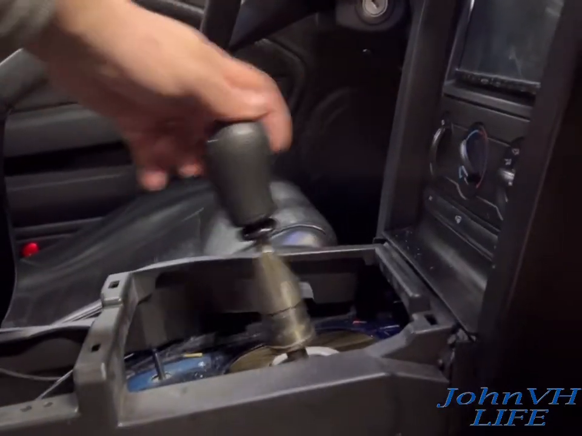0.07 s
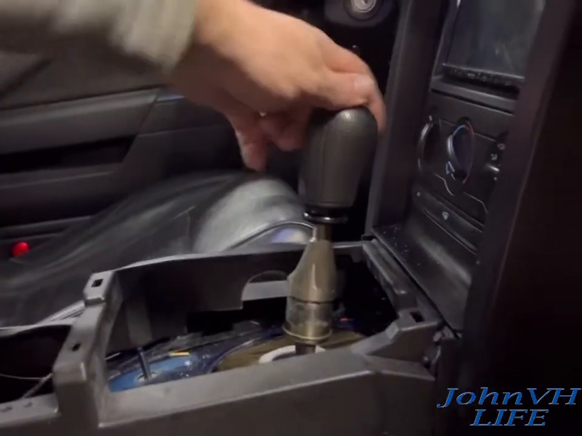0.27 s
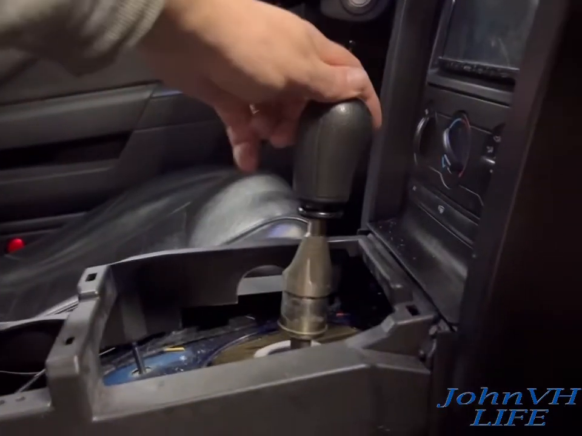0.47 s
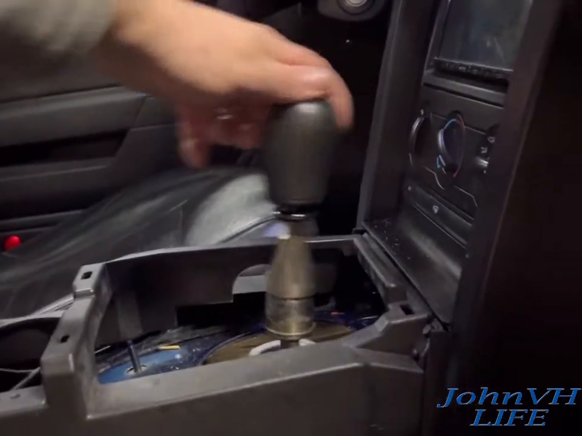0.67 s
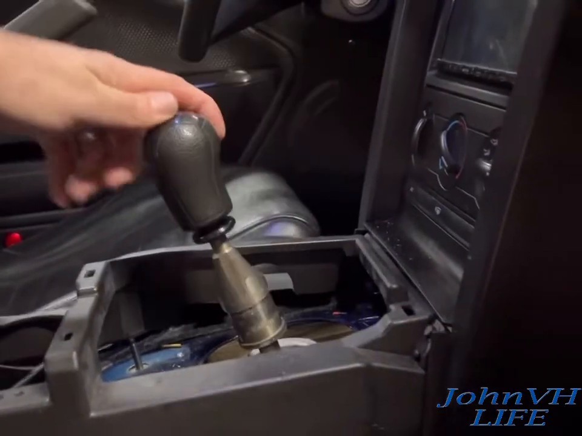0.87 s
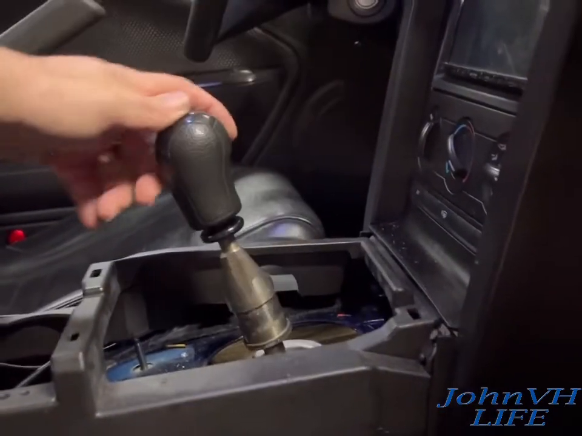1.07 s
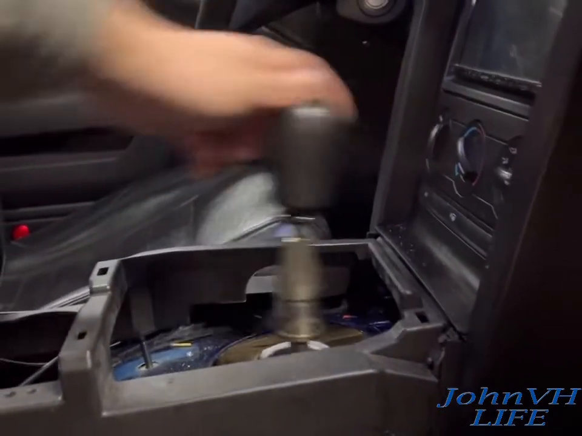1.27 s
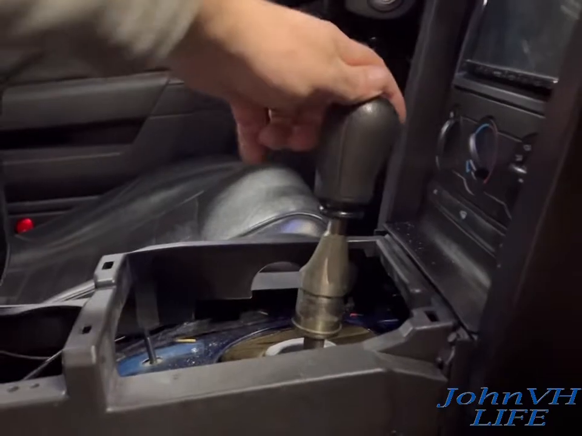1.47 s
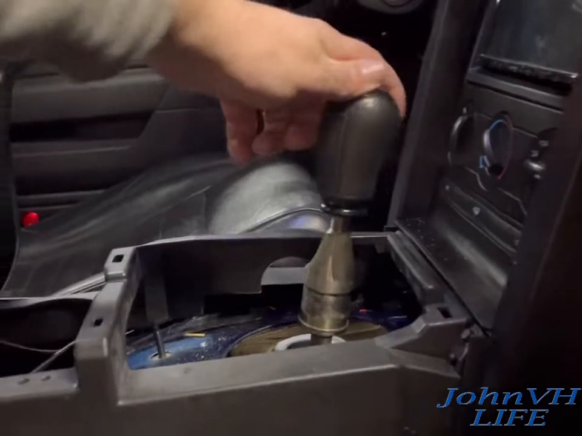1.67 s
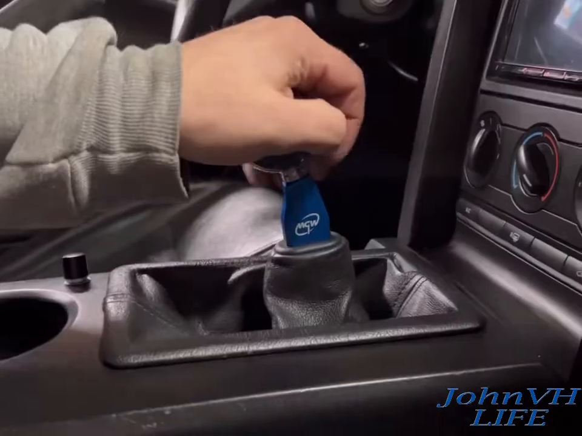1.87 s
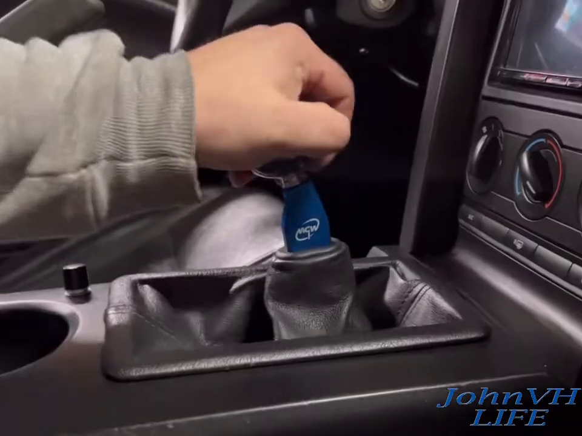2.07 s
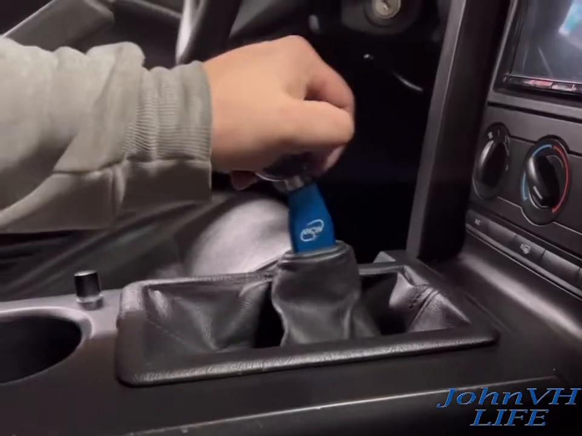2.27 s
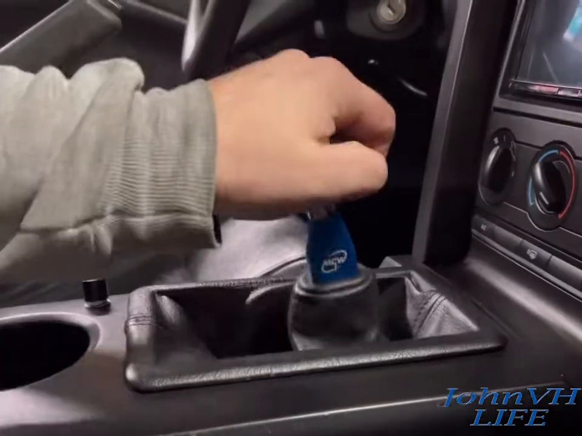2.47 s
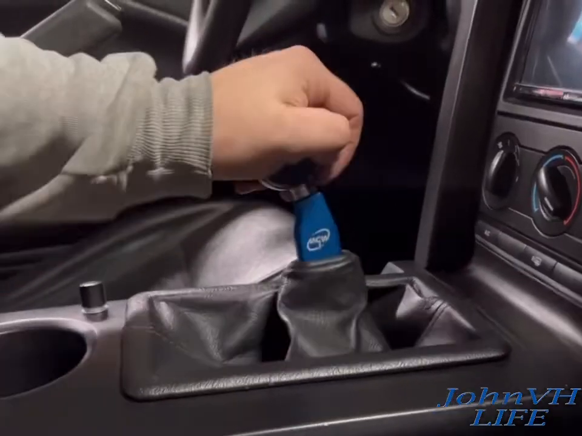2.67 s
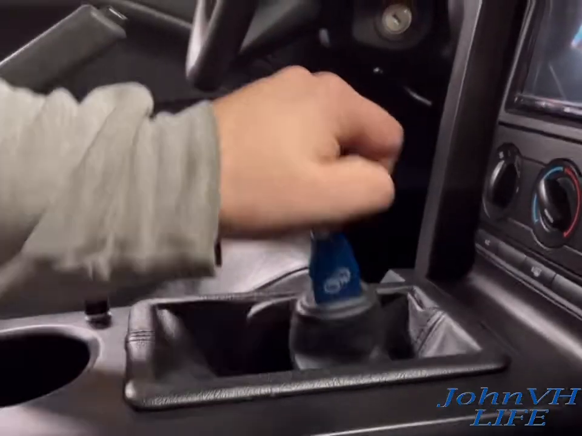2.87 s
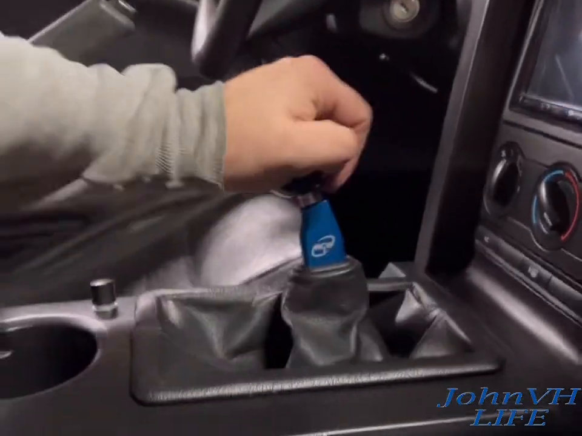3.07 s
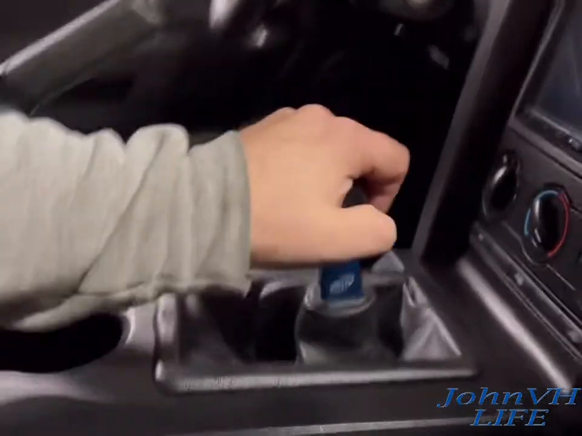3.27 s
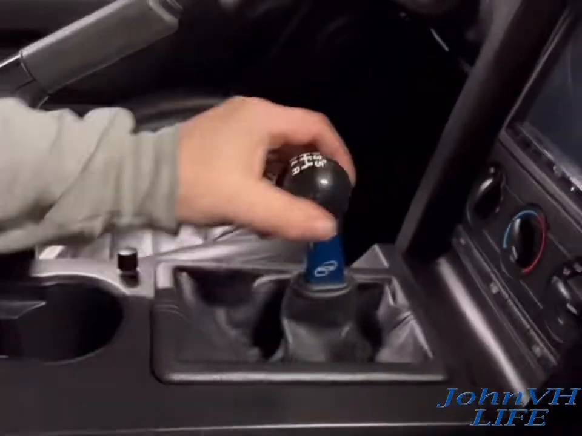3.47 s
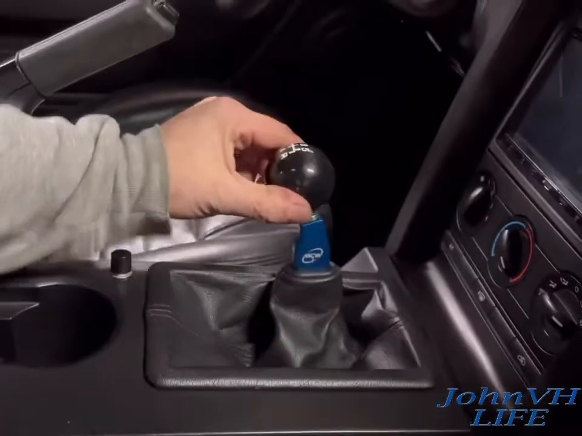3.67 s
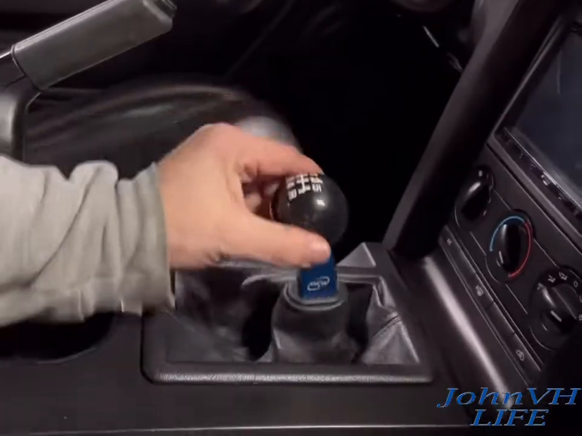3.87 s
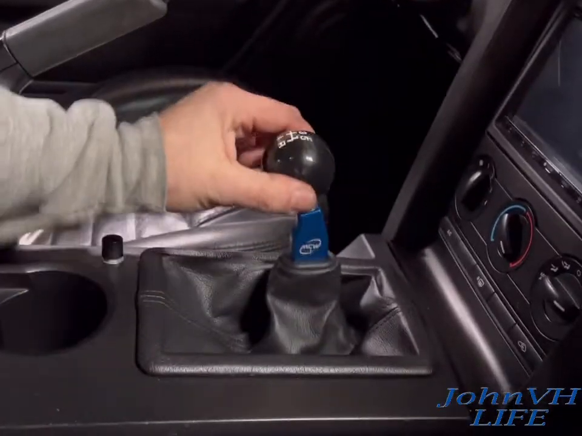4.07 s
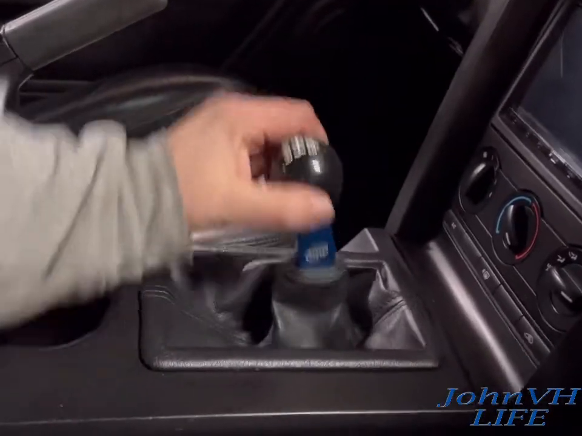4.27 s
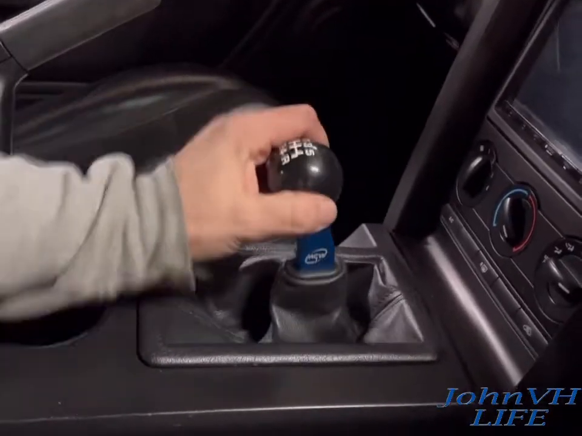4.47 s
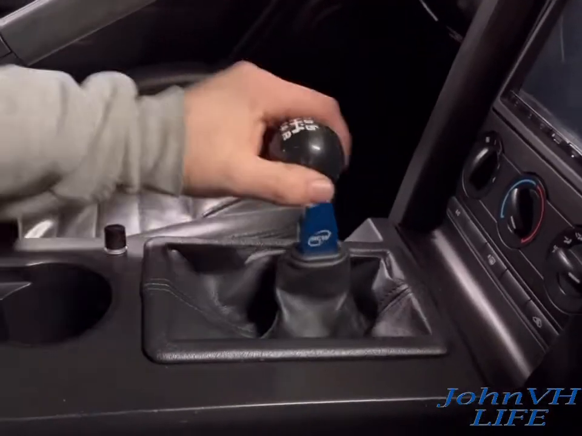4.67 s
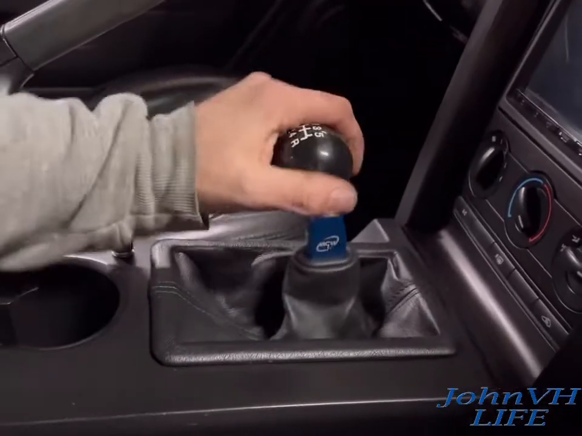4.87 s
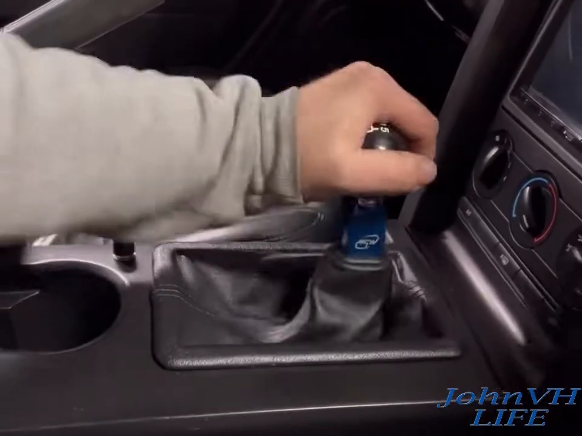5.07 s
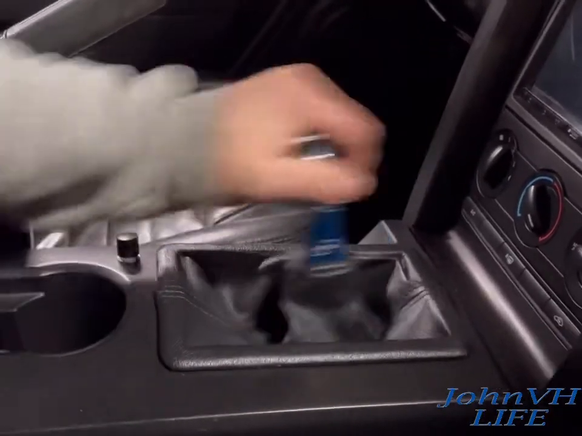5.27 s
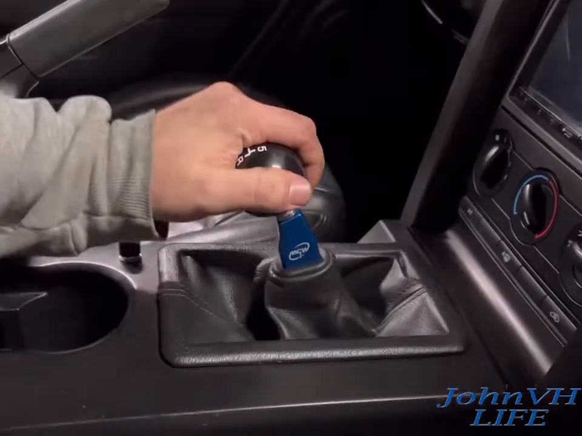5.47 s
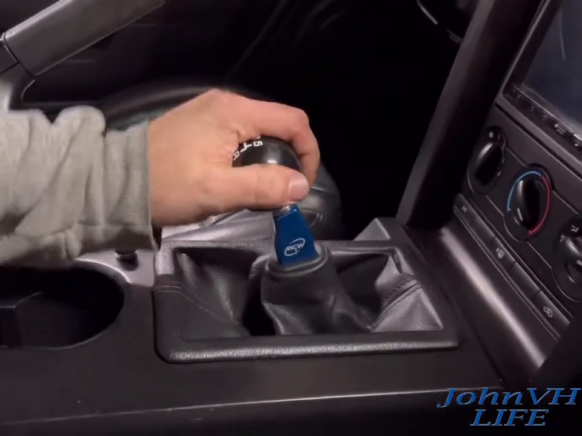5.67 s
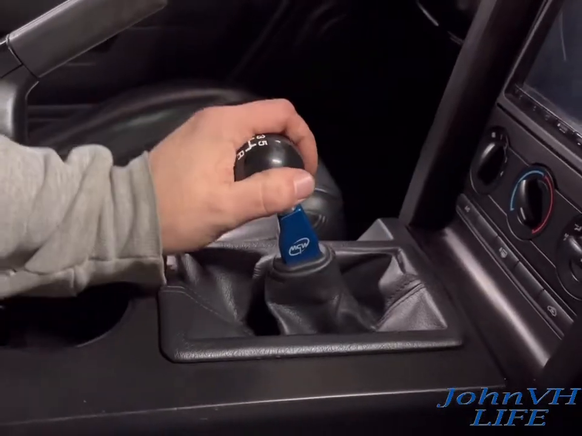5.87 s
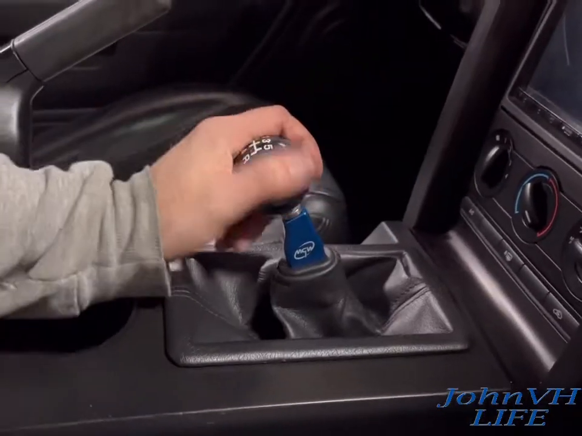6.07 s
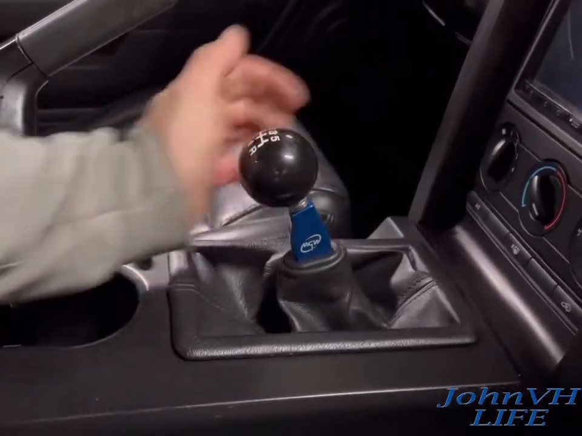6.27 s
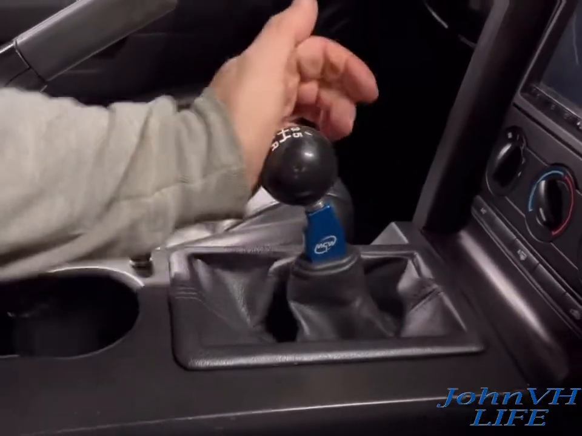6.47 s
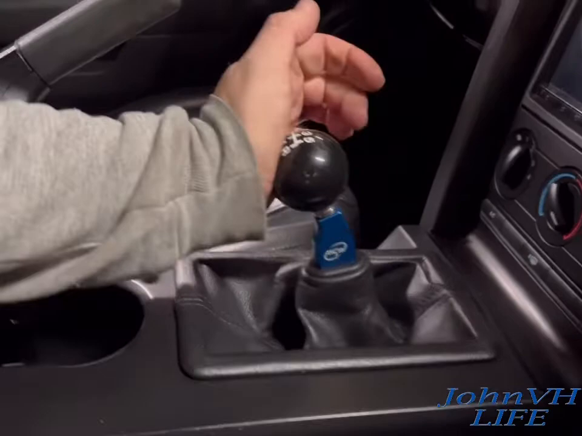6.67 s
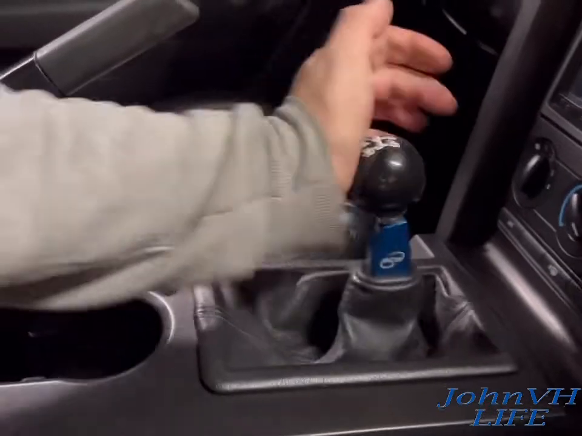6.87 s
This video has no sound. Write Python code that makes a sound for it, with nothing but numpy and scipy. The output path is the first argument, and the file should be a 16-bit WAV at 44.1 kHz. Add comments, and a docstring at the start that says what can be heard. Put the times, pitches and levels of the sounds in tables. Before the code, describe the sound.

Close stereo in a parked car with steady soft air hiss. A bare gear lever slides with short metal scrapes into hard, bright clacks at about 0.16, 0.77, 1.29 and 1.83 s, each with a brief metallic ring, low floor thump and short hard-walled reflection; light rubbing fills the start. At 1.84 s a hard cut brings a duller, quieter hiss and faint low hum. From 2.1 to 4.7 s a booted lever is wiggled: irregular muffled thumps, strongest near 2.84, 3.03 and 3.23, small ticks, leather and trim creaks, sleeve rustle, and tiny thin squeaks around 4.5. Two forceful shifts scrape and clunk at 5.03 and 5.32 to 5.36 s, deep and booming, the second heaviest. Near-quiet follows, then faint hand taps from 6.14, a soft thump at 6.36, and light knocks with a creak and scrape near 6.8.

```python
"""Inside a parked car, a hand throws a bare gear lever between its stops over the hiss of still air.
After a hard cut, a lever in a leather boot wiggles, then shifts harder, over a faint hum and a duller hiss.
Swelling low tones make the thumps and coloured noise the shaking pan; bursts of force ring the linkage.
Uneven noise rustles, scrapes and creaks, gliding tones squeak, and a noise tail is the garage's answer."""
import sys
import numpy as np
from scipy import signal
from scipy.fft import rfft, irfft, next_fast_len
from scipy.io import wavfile
from scipy.ndimage import uniform_filter1d

SR = 44100
rng = np.random.default_rng(int(sys.argv[2]) if len(sys.argv) > 2 else 0)


def digitize_waveform(pressure):
    """Quantize a signal to 16-bit integers and store it at the path in sys.argv[1].

    Rows of a 2-D input are taken as channels; values are limited to [-1, 1].
    """
    field = np.atleast_2d(pressure).T
    bounded = np.clip(field, -1, 1)
    quanta = np.round(bounded * 32767).astype(np.int16)
    wavfile.write(sys.argv[1], SR, quanta)


def magnitude_from_level(level_db):
    """Linear magnitude for a level in decibels (20 dB per decade)."""
    exponent = np.asarray(level_db, float) / 20
    return 10 ** exponent


N = 304731
CUT_S = 1.8395  # the bare lever gives way to the booted one

# Colours of noise are relative, since the noise is then set to rms 1.
# still air around each lever: pitch_hz [Hz], relative_db [dB]
AIR_BARE = [(76, -17.5), (130, 4), (247, 15), (308, 3.5), (400, 9), (552, 4), (1230, 5), (1900, -3),
            (6530, -18), (9950, -37.5), (15800, -36.5)]
AIR_BOOTED = [(90, -20), (140, 0), (300, -9), (900, -25.5), (1980, -30.5), (2130, -22.5), (2300, -34),
              (6800, -43.5), (7600, -49.5), (15800, -51)]
# low rumble under the hum: pitch_hz [Hz], relative_db [dB]
RUMBLE_COLOUR = [(30, -30), (47.6, 0), (70, -16), (300, -90)]

# thin high swishes: start_s [s], held_s [s], level_db [dB]
SWISHES = [(3.3, 0.069, -66.5), (3.5, 0.068, -71), (5.78, 0.24, -75)]
# their colour: pitch_hz [Hz], relative_db [dB]
SWISH_COLOUR = [(2800, -29.5), (3300, -9), (5600, -15), (6500, 0), (7100, -9), (7500, -22.5)]
# faint squeaks of boot and linkage, before waver and flicker:
# start_s [s], length_s [s], from_hz [Hz], to_hz [Hz], level_db [dB]
SQUEAKS = [(0.398, .24, 4650, 4680, -72.5), (4.466, 0.039, 3750, 4360, -69),
           (4.577, 0.037, 3680, 4370, -61), (4.583, .055, 5000, 5650, -64),
           (4.584, 0.071, 3260, 3400, -66.5), (4.67, 0.023, 3120, 3200, -64),
           (4.79, 0.092, 3880, 3960, -72), (4.915, 0.095, 3750, 3830, -72.5)]

# strokes of hand, sleeve and boot, before patchiness: start_s [s], held_s [s], dull_db [dB], bright_db [dB]
STROKES = [(0.0, 0.18, -64, -56.5), (0.401, 0.39, -87, -65.5), (2.12, 0.035, -65, -67.5),
           (2.269, 0.22, -65.5, -85), (2.57, 0.034, -62.5, -72.5), (2.64, 0.043, -61, -62),
           (2.975, 0.03, -58, -65), (3.02, 0.02, -63.5, -59.5), (3.121, 0.27, -65, -65.5),
           (3.451, 0.25, -64.5, -69.5), (3.74, 0.059, -64.5, -82.5), (3.981, 0.17, -64.5, -73.5),
           (4.281, 0.21, -66.5, -67), (4.461, 0.036, -69.5, -62), (4.579, 0.13, -66, -65),
           (6.29, 0.036, -68.5, -77.5), (6.48, 0.22, -64.5, -71), (6.811, 0.051, -63, -57.5)]
# colour of the rubbing: pitch_hz [Hz], relative_db [dB]
RUSTLE_COLOUR = [(400, -24), (750, -4), (2200, -9), (3400, -13.5), (5000, -19.5), (6900, -14),
                 (7600, -31.5), (10000, -44.5), (14000, -24.5), (15800, -56)]
STROKE_RISE_S, STROKE_FALL_DB_S = 0.043, 83

# selector sliding into gear, metal on metal: start_s [s], held_s [s], level_db [dB]
SLIDES = [(.095, 0.095, -52), (.715, 0.079, -49.5), (1.21, 0.077, -52.5), (1.755, 0.07, -69),
          (5.02, 0.079, -45.5), (5.272, 0.036, -42), (5.3, 0.028, -38), (6.82, 0.048, -52)]
# colour of the scrape: pitch_hz [Hz], relative_db [dB]
SCRAPE_COLOUR = [(410, 12), (700, -6.5), (1300, 0), (2250, -5), (2590, -5.5), (3580, -13), (4700, -14),
                 (5640, -12), (8210, -21.5), (9850, -45), (12100, -31), (15500, -38)]
# modes of the gearbox casing: pitch_hz [Hz], level_db [dB], t60_s [s]
CASING = [(883, -42.5, 0.46), (1144, -39, 0.2), (2500, -33.5, 0.033), (2920, -38.5, 0.014),
          (4430, -47, 0.066), (5200, -35.5, 0.02)]

# console trim and boot creaking under load, before patchiness: start_s [s], held_s [s], level_db [dB]
CREAKS = [(2.12, 0.022, -60), (2.285, 0.013, -69.5), (2.545, 0.043, -56.5), (2.775, 0.069, -56),
          (2.965, 0.043, -56.5), (3.06, 0.025, -66), (3.155, 0.041, -55), (3.34, 0.015, -56.5),
          (3.76, 0.018, -60.5), (3.94, 0.065, -56.5), (4.11, 0.027, -62), (4.26, 0.092, -62),
          (4.41, 0.025, -57.5), (4.56, 0.045, -61.5), (4.98, 0.094, -48.5), (5.24, 0.097, -47.5),
          (6.5, 0.04, -57), (6.81, 0.084, -46)]
# colour of the trim: pitch_hz [Hz], relative_db [dB]
TRIM_COLOUR = [(180, -32.5), (250, -1.5), (340, -2), (560, -7), (800, -16), (1400, -23), (3000, -83.5)]

# jolts that leave the floor pan shaking loosely: start_s [s], held_s [s], level_db [dB]
JOLTS = [(0.0, 0.052, -50.5), (0.101, 0.14, -36), (.48, 0.087, -52), (.72, 0.082, -29.5),
         (.87, 0.079, -43.5), (1.06, 0.031, -39), (1.221, 0.13, -31.5), (1.751, 0.033, -31),
         (2.109, 0.04, -40), (2.3, 0.15, -35.5), (2.57, 0.075, -33), (2.781, 0.092, -32),
         (2.971, 0.12, -31.5), (3.17, 0.096, -36), (3.37, 0.028, -34.5), (3.598, 0.056, -41),
         (3.77, 0.16, -37.5), (3.95, 0.041, -35), (4.132, 0.061, -35), (4.28, 0.024, -33.5),
         (4.431, 0.014, -36.5), (4.58, 0.047, -41), (4.992, 0.07, -26), (5.259, 0.16, -34.5),
         (5.55, 0.043, -55), (6.31, .07, -35), (6.49, 0.21, -50.5), (6.8, 0.064, -26)]
# colour of the shaking pan under each lever: pitch_hz [Hz], relative_db [dB]
PAN_BARE = [(15, -33), (25, -27.5), (50, 3), (86, 0.5), (102, -2), (140, -14), (220, -26.5), (290, -74.5)]
PAN_BOOTED = [(15, -57.5), (25, -30.5), (74, -3.5), (97, -1), (127, -3), (199, -23), (220, -31.5),
              (290, -78.5)]
# floor pan thumps: crest_s [s], peak_db [dB], pitch_hz [Hz], half_length_ms [ms, Gaussian]
THUMPS = [(0.1323, -30.5, 60.7, 8.5), (0.1967, -17, 70.2, 16.3), (0.746, -17, 80, 9), (0.8113, -12, 83, 10),
          (1.3254, -20.5, 84, 20.5), (1.791, -20.5, 79.6, 9.2), (2.3398, -25, 82.2, 19),
          (2.4343, -18, 104.6, 14.2), (2.5884, -23.5, 90.4, 15), (2.6054, -21.5, 126, 19),
          (2.652, -21.5, 97.3, 16), (2.694, -26, 86, 11), (2.803, -25.5, 104.6, 5.8),
          (2.8431, -14.5, 102.4, 9.8), (3.0262, -11.5, 102.4, 15), (3.2, -23.5, 85.2, 28),
          (3.2318, -12, 99, 7.5), (3.388, -28.5, 108.5, 11), (3.5444, -26, 106.5, 11),
          (3.8, -21, 96.7, 5.3), (3.971, -26.5, 124, 13), (3.993, -24.5, 84.4, 7.1),
          (4.012, -20, 113, 17.7), (4.1808, -25.5, 88, 11), (4.3119, -21.5, 106.8, 17),
          (4.4799, -24, 106, 16), (4.623, -21, 116.8, 8.6), (5.028, -18, 94, 8), (5.0499, -8, 99.4, 8.1),
          (5.061, -9, 92.5, 8.5), (5.316, -7.5, 91.7, 8), (5.335, -17, 140, 30.5),
          (5.3591, -3.5, 102.8, 7.6), (6.3559, -12.5, 112.3, 8)]
JOLT_RISE_S, JOLT_FALL_DB_S = 0.0096, 248.5
SWAY_DB, SWAY_FALL_DB_S = -13.5, 39.5  # the body sways on after each jolt

# tone of the garage's answer: pitch_hz [Hz], gain_db [dB]
GARAGE_COLOUR = [(300, -17.0), (1200, -8.0), (3000, -1.5), (9000, -10.5)]

# metal contacts in the linkage, levels as energy of the force before it rings or cracks:
# contact_s [s], knock_db [dB], tick_db [dB], chatter_ms [ms, decay of the knock]
KNOCKS = [(0.083, -36, -36.5, 17), (0.094, -27, -47, 12), (0.142, -33.5, -39.5, 4),
          (0.162, -13.5, -32.5, 5.4), (0.698, -38.5, -35, 18), (0.709, -27.5, -40.5, 9.8),
          (0.774, -15, -28, 8.8), (1.079, -45, -36.5, 3.6), (1.2, -40, -40, 3.3), (1.216, -28.5, -42, 18),
          (1.268, -40.5, -44, 4), (1.29, -19.5, -31, 9.2), (1.744, -57, -38, 22), (1.757, -27, -38.5, 21),
          (1.808, -31, -46.5, 13), (1.819, -38.5, -34, 4.6), (1.827, -12.5, -25, 21),
          (2.133, -52.5, -45, 2.4), (2.168, -40.5, -31, 2.9), (2.18, -42.5, -32, 3.5),
          (2.266, -49.5, -38, 10), (2.292, -38, -79, 41), (2.544, -39, -63, 19), (2.665, -37, -35.5, 2.6),
          (2.677, -51.5, -29, 4.6), (2.695, -48.5, -32, 2.8), (2.968, -40.5, -58, 14), (3, -36.5, -52, 6.7),
          (3.051, -37.5, -38.5, 1.5), (3.058, -35.5, -29.5, 3.7), (3.062, -41.5, -25.5, 4),
          (3.157, -40.5, -67, 30), (3.343, -40.5, -57, 8.6), (4.97, -38.5, -65, 2.6),
          (5.031, -12, -38.5, 5.5), (5.244, -54.5, -61.5, 10), (5.287, -22.5, -45.5, 5.2),
          (5.324, -9, -51, 13), (6.141, -44.5, -79, 4.5), (6.19, -43.5, -96, 2.38), (6.28, -41, -59.5, 3.4),
          (6.309, -47.5, -40, 4.8), (6.32, -32, -46, 7.7), (6.465, -45, -68, 2.83), (6.496, -44, -67, 3.6),
          (6.516, -43.5, -62, 4), (6.588, -40.5, -59.5, 7.5), (6.627, -35, -83, 8.5), (6.64, -43, -63, 3.8),
          (6.687, -36, -44.5, 8), (6.786, -40, -80, 5.3), (6.803, -43.5, -59, 12), (6.823, -34, -45.5, 5),
          (6.849, -36.5, -55, 4.4)]
# modes of each lever, before the spread between contacts: pitch_hz [Hz], level_db [dB], t60_s [s]
BARE = [(446.6, -2, 0.055), (508.6, -7, 0.11), (573, -16, 0.066), (835, -10.5, 0.01), (1066, -6.5, 0.016),
        (1254, -5, 0.012), (1860, -13.5, 0.0054), (2280, -16.5, 0.013), (3750, -4.5, 0.0061),
        (4195, -14.5, 0.015), (4650, -10, 0.0037), (8360, -15, 0.012)]
BOOTED = [(329.5, -5, 0.064), (411, -9, 0.053), (542, -4.5, 0.024), (772, -8, 0.022), (1067, -9, 0.011),
          (1460, -19, 0.012), (2230, -35.5, 0.007), (4370, -20, 0.0027)]
# pitchless crack of a contact on each lever: pitch_hz [Hz], gain_db [dB]
CRACK_BARE = [(800, 6), (1900, 7), (4500, 16), (8500, 4.5), (10000, -14.5), (13000, 9), (16000, -26)]
CRACK_BOOTED = [(800, -0.5), (1500, 14), (3000, 8.5), (4500, 11.5), (8000, -5), (10000, -22.5),
                (14000, -9.5)]
DETUNE, UNEVEN_DB = .02, 2.5  # each contact lands elsewhere: spread of mode pitch (share) and strength

# contour of the two microphone ports, each applying its own share: pitch_hz [Hz], contour_db [dB]
EARS = [(60, -4), (110, -6.5), (200, -2.5), (380, 2), (700, -4.5), (1290, 0), (2380, -0.5), (4400, 6.5),
        (8120, 2.5), (15000, -4.5)]


def shape(x, rows, share=1):
    """Filters by a share of a (Hz, dB) contour, drawn straight over log frequency."""
    size = next_fast_len(N + 4096)
    hz, db = np.transpose(rows)
    log_hz = np.log(np.arange(1, size // 2 + 2) * SR / size)
    gain = magnitude_from_level(share * np.interp(log_hz, np.log(hz), db))
    return irfft(rfft(x, size) * gain, size)[..., :N]


def noise(rows, alike_hz):
    """Coloured stereo noise of rms 1, nearly the same on both sides below alike_hz."""
    mid, side = shape(rng.standard_normal((2, N)), rows)
    side = signal.sosfilt(signal.butter(2, alike_hz, "high", fs=SR, output="sos"), side)
    return np.array([mid + side, mid - side]) / np.std(mid + side)


def walk(rate):
    """Random levels held 1 / rate s and slewed twice."""
    k = int(SR / rate)
    steps = np.repeat(rng.standard_normal(N // k + 1), k)
    slewed = uniform_filter1d(uniform_filter1d(steps, k), k)
    return 0.91 * slewed[:N]


def patchy(x):
    """Folds bring out one band, then another: each third of an octave swells and fades alone."""
    spectrum = rfft(x)
    hz = np.clip(np.arange(N // 2 + 1) * SR / N, 300, 8000)  # the outer bands take in all beyond
    band = np.floor(3 * np.log2(hz / 300))
    out = 0
    for k in np.unique(band):
        level_db = 3.5 * (walk(32) - .5)
        out = out + magnitude_from_level(level_db) * irfft(spectrum * (band == k), N)
    return out


def swell(rows, rise_s, fall_db_s):
    """Gain of events that rise 30 dB in rise_s up to their start, hold, then fall; the cut bounds them."""
    t, power = np.arange(N) / SR, 0
    for s, held, db in rows:
        rise_db = 30 * np.maximum(s - t, 0) / rise_s
        fall_db = fall_db_s * np.maximum(t - s - held, 0)
        same_side = (t > CUT_S) == (s > CUT_S)
        power = power + magnitude_from_level(db - rise_db - fall_db) ** 2 * same_side
    return np.sqrt(power)


def ring(knock, tick, modes, turn):
    """Blunt force drives the low modes, sharp force the high; each reaches the two ports in its own phase."""
    out = np.zeros((2, len(knock)))
    for k, (hz, db, t60) in enumerate(modes):
        pole = np.exp(2j * np.pi * hz / SR - np.log(1000) / (t60 * SR))
        force = knock if hz < 3000 else tick
        mode = signal.lfilter([(-1) ** k * magnitude_from_level(db)], [1, -pole], force)
        spread = turn * min(hz / 300, 1.5) * np.cos(2.6 * k)  # radians between the ports
        out += np.imag(mode * np.exp(.5j * spread * np.array([[1], [-1]])))
    return out


def still_air(colour, level_db, alike_hz):
    """Steady hiss of the still air: coloured noise at a fixed level."""
    return magnitude_from_level(level_db) * noise(colour, alike_hz)


def hum():
    """A distant mains hum, a sine that wavers a little in level, over a low noise rumble."""
    sine = np.sqrt(2) * np.sin(2 * np.pi * 240 * np.arange(N) / SR)
    tone = magnitude_from_level(-61 + walk(6)) * sine
    return tone + magnitude_from_level(-52) * noise(RUMBLE_COLOUR, alike_hz=490)


def swishes():
    """Thin high noise, perhaps a sleeve, that swells and fades."""
    return swell(SWISHES, STROKE_RISE_S, STROKE_FALL_DB_S) * noise(SWISH_COLOUR, alike_hz=300)


def squeaks():
    """Short thin tones that glide, waver in pitch and break up in level."""
    t, waver, out = np.arange(N) / SR, walk(400), 0
    for s, length, from_hz, to_hz, db in SQUEAKS:
        u = np.clip((t - s) / length, 0, 1)
        hz = (from_hz + (to_hz - from_hz) * u) * (1 + .018 * waver)
        tone = np.sin(2 * np.pi * np.cumsum(hz) / SR)
        out = out + magnitude_from_level(db) * np.sin(np.pi * u) * tone
    flicker_db = 4 * (walk(120) - .5)
    return out * magnitude_from_level(flicker_db)


def rustle():
    """Hand, sleeve and boot rub: patchy noise split into a dull and a bright part, each with its own swells."""
    rub, out = patchy(noise(RUSTLE_COLOUR, alike_hz=300)), 0
    for column, side in ((2, "low"), (3, "high")):
        part = signal.sosfilt(signal.butter(3, 2930, side, fs=SR, output="sos"), rub)
        strokes = np.array(STROKES)[:, [0, 1, column]]
        out = out + swell(strokes, STROKE_RISE_S, STROKE_FALL_DB_S) * part
    return out


def scrape():
    """The selector's uneven metal rubbing is heard as noise and sets the gearbox casing ringing."""
    grip = swell(SLIDES, rise_s=0.05, fall_db_s=121) * magnitude_from_level(1.5 * walk(150))
    slip = grip * rng.standard_normal(N)
    return grip * noise(SCRAPE_COLOUR, alike_hz=794) + ring(slip, slip, CASING, turn=1.16)


def trim_creak(shake):
    """Trim and boot creak as the lever loads them, and the trim buzzes with the shaking pan."""
    strain = magnitude_from_level(-26.5) * shake + swell(CREAKS, rise_s=0.019, fall_db_s=304)
    return strain * magnitude_from_level(walk(60)) * patchy(noise(TRIM_COLOUR, alike_hz=250))


def pan_shake():
    """Strength of the pan's shaking: quick jolts, a slower sway after each, and a faint rest level."""
    jolt = swell(JOLTS, JOLT_RISE_S, JOLT_FALL_DB_S)
    sway = swell(JOLTS, JOLT_RISE_S, SWAY_FALL_DB_S)
    return jolt + magnitude_from_level(SWAY_DB) * sway + magnitude_from_level(-56)


def floor_pan(shake):
    """Each soft push swells and fades over a few cycles; low noise is the pan shaking at random."""
    t = np.arange(N) / SR
    pan = np.where(t < CUT_S, noise(PAN_BARE, alike_hz=400), noise(PAN_BOOTED, alike_hz=400))
    out = shake * magnitude_from_level(2.8 * walk(30)) * pan
    for s, db, hz, ms in THUMPS:
        near = slice(max(int((s - .15) * SR), 0), int((s + .15) * SR))
        lag = t[near] - s
        envelope = np.exp(-.5 * (1000 * lag / ms) ** 2)
        out[:, near] += magnitude_from_level(db) * envelope * np.cos(2 * np.pi * hz * lag)
    out[1] = np.roll(out[1], shift=6)  # samples later at the right port
    return out


def garage(x, tail_db):
    """Hard walls outside the open door: a fading noise tail, different on each side."""
    t = np.arange(int(.6 * SR)) / SR
    fade = magnitude_from_level(-60 * t / 0.25)  # 60 dB in 0.25 s
    tail = rng.standard_normal((2, len(t))) * fade * (1 - np.exp(-t / 0.00057))
    tail *= magnitude_from_level(tail_db) / np.sqrt(np.sum(tail ** 2) / 2)  # tail energy, ahead of its colour
    wet = signal.fftconvolve(shape(x, GARAGE_COLOUR), tail, axes=1)
    return x + wet[:, :N]


def contact_force(knock_db, tick_db, chatter_ms, blow_share, t):
    """One firm blow inside a short random chatter; the sharp part is briefer than the blunt one."""
    grit = rng.standard_normal((2, len(t)))
    onset = 1 - np.exp(-t / [[.003], [.0018]])
    fade = onset * np.exp(-1000 * t / (chatter_ms * np.array([[1], [.6]])))
    fade /= np.sqrt(np.sum(fade ** 2, axis=1, keepdims=True))
    push = np.sqrt(1 - blow_share) * grit * fade
    push[:, 88] += np.sqrt(blow_share)  # the blow lands 2 ms into the chatter
    return magnitude_from_level([[knock_db], [tick_db]]) * push


def linkage():
    """Contacts ring the bare or booted lever, thud and crack without pitch, and the garage answers."""
    size = SR // 5
    t = np.arange(size) / SR
    bodies, ticks = np.zeros((2, 2, N + size)), np.zeros((2, N + size))
    thud_band = signal.butter(2, (600, 2600), "band", fs=SR, output="sos")
    for s, knock_db, tick_db, ms in KNOCKS:
        lever = int(s > CUT_S)  # 0 bare, 1 booted
        blow_share = (0.055, 0.1)[lever]  # of the contact's energy
        knock, tick = contact_force(knock_db, tick_db, ms, blow_share, t)
        modes = []
        for hz, db, t60 in (BARE, BOOTED)[lever]:
            a, b = rng.standard_normal(2)
            modes.append((hz * (1 + DETUNE * a), db + UNEVEN_DB * b, t60))
        thud = magnitude_from_level(7) * signal.sosfilt(thud_band, knock)
        i = int((s - .001) * SR)
        bodies[lever, :, i:i + size] += ring(knock, tick, modes, turn=0.78) + thud
        ticks[lever, i:i + size] += tick
    out = []
    # the boot muffles the linkage, so its garage tail is 10 dB lower
    for body, tick, colour, tail_db in zip(bodies[..., :N], ticks[:, :N], (CRACK_BARE, CRACK_BOOTED), (0, -10)):
        crack = shape(tick, colour)
        late_crack = np.roll(crack, shift=4)  # samples later at the right port
        out.append(garage(body + np.array([crack, late_crack]), tail_db))
    return out


def scene():
    """The bare lever, then the booted one, joined by a hard cut."""
    first = np.clip((CUT_S - np.arange(N) / SR) / 0.00016, 0, 1)
    bare, booted = linkage()
    bare = bare + still_air(AIR_BARE, level_db=-56.5, alike_hz=276)
    booted = booted + hum() + still_air(AIR_BOOTED, level_db=-62, alike_hz=340)
    levers = first * bare + (1 - first) * booted
    shake = pan_shake()
    rubbing = rustle() + swishes() + scrape()
    return levers + floor_pan(shake) + trim_creak(shake) + rubbing + squeaks()


def top_cut(x):
    """Nothing passes above the cut-off."""
    return signal.sosfilt(signal.butter(12, 16010, fs=SR, output="sos"), x)


def record(dry):
    """The two microphone ports differ in colour."""
    left = shape(dry[0], EARS, share=0.62)
    right = shape(dry[1], EARS, share=-0.032)
    return top_cut(np.array([left, right]))


dry = scene()
out = record(dry)
digitize_waveform(out)
```